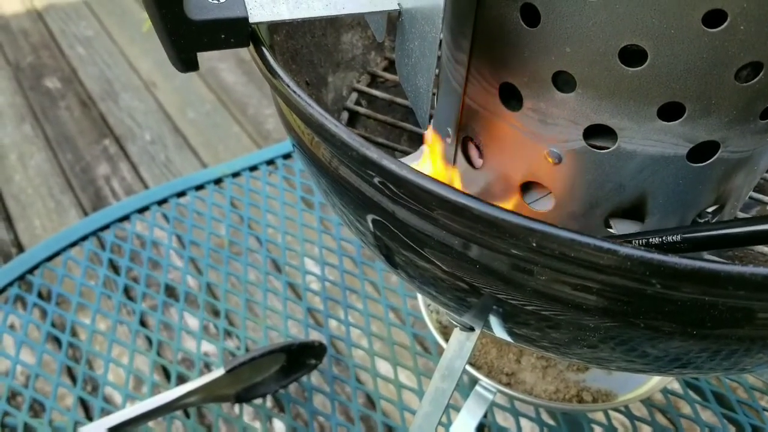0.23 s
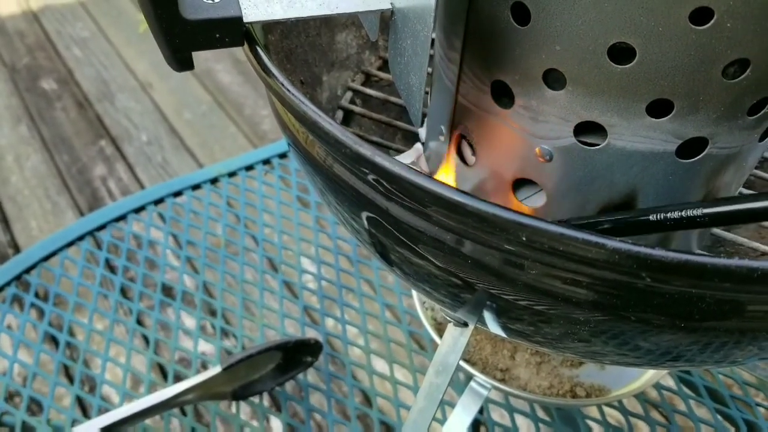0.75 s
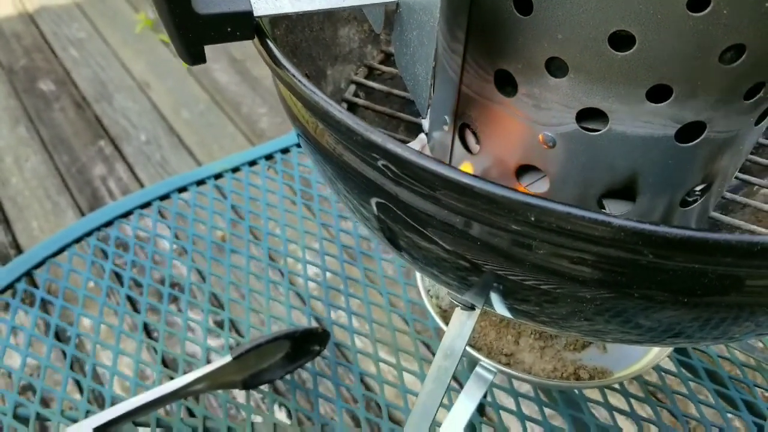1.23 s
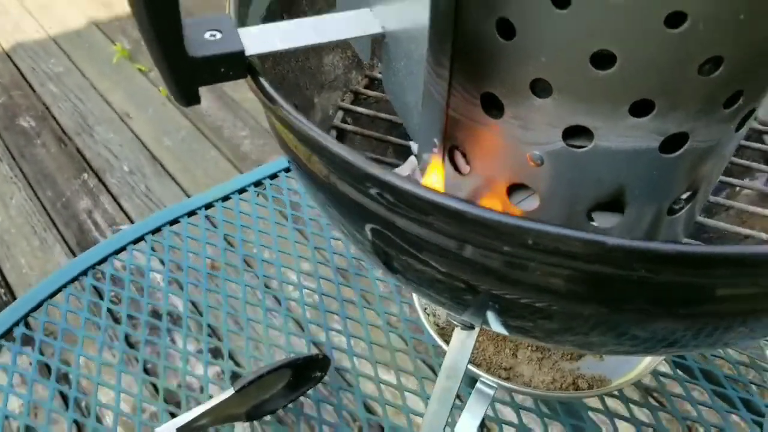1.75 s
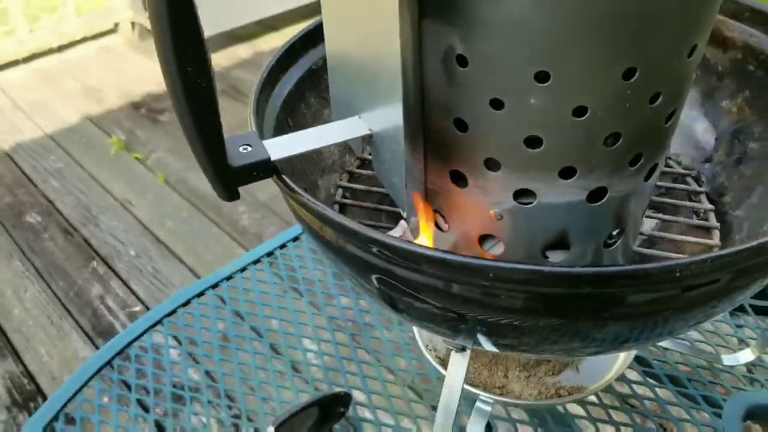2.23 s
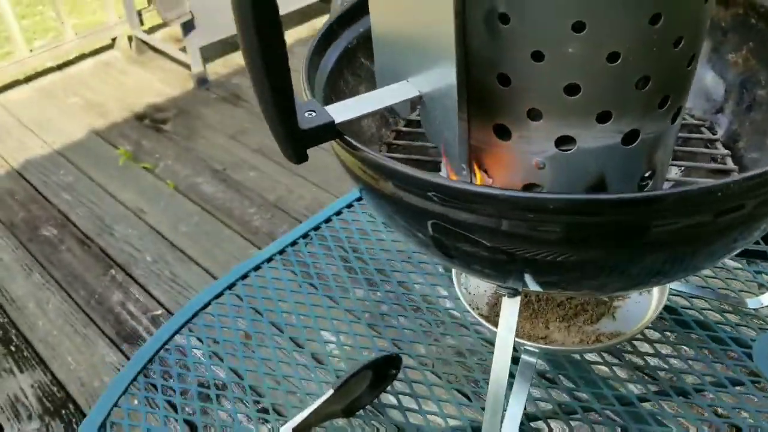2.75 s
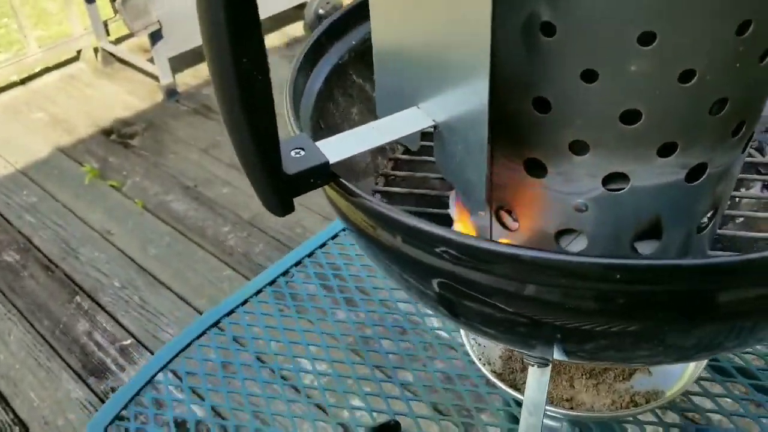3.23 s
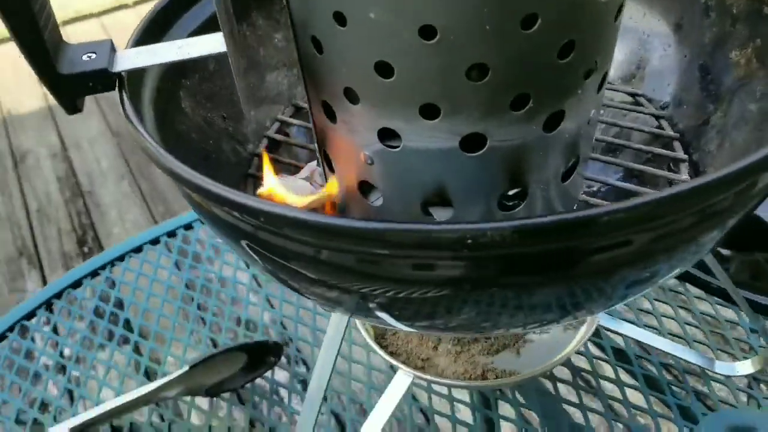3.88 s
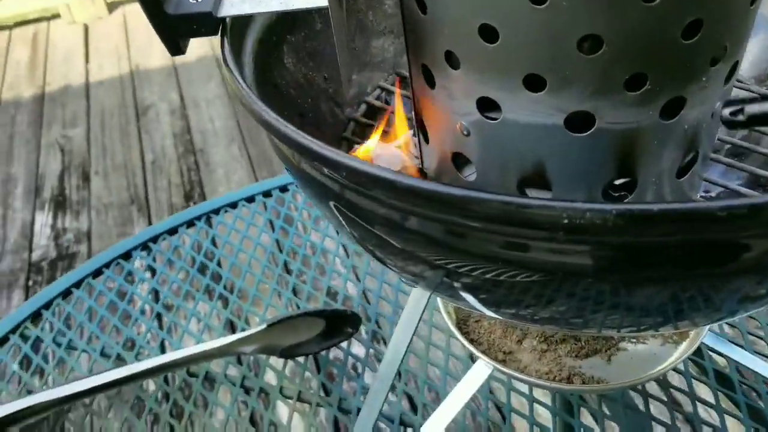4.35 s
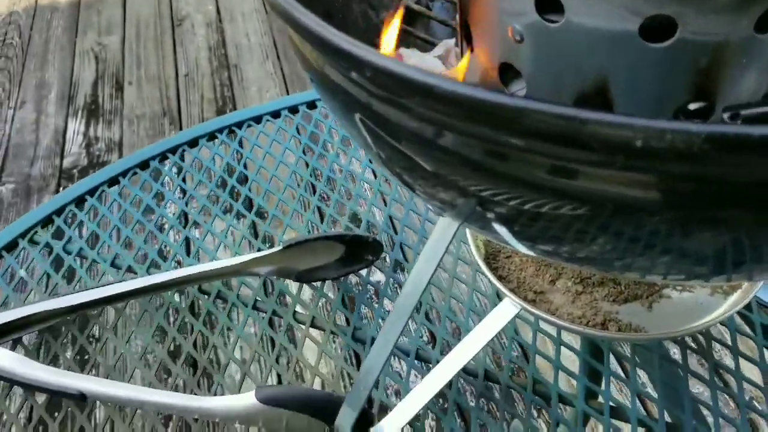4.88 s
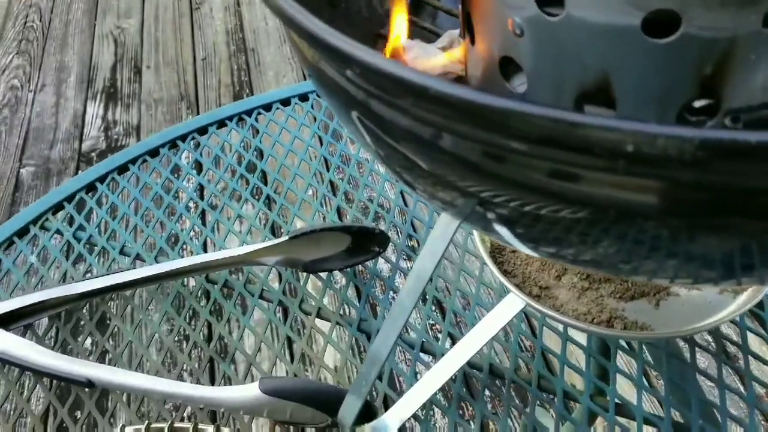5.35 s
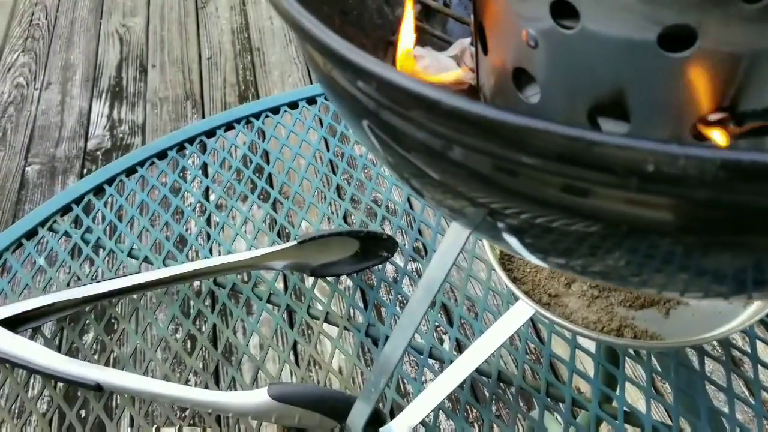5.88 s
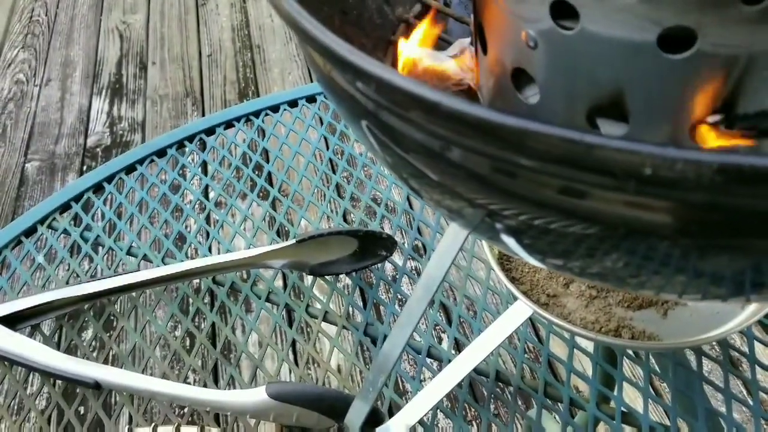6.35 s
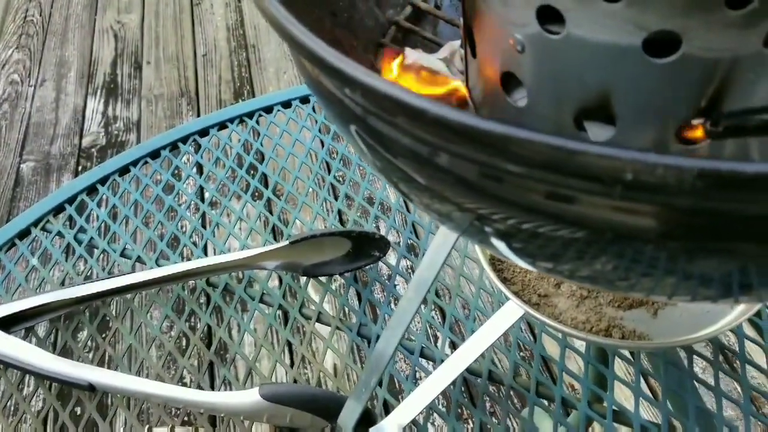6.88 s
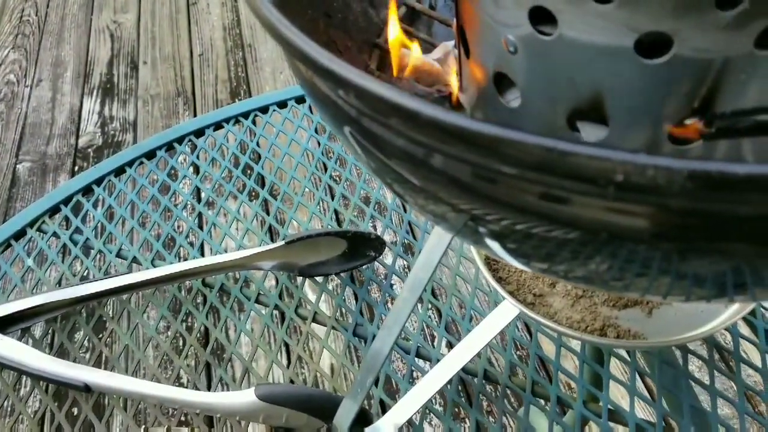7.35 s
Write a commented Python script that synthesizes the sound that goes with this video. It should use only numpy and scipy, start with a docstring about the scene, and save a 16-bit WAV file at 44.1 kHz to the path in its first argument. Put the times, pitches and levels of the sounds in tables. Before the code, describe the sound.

Paper burns under a charcoal chimney starter in a yard, with a low flame rumble and a hollow draught. Sharp, irregular pops and clicks rattle in the steel grill, and shoes scuff faintly. A long gas lighter is handled and snapped twice, its spring ringing briefly. Then the fire sounds quieter, with fine crackles, while gusts thump on the right side of the close microphone. A distant fan hums faintly.

```python
"""In a yard, paper burns and ticks under a charcoal chimney starter in a small kettle grill.
A long gas lighter is handled and fired twice, its spring ringing after each snap. Every pop and
click is an impulse that rattles around the steel bowl and echoes from the yard. The flames rumble,
the draught roars and a distant fan unit hums. Shoes scuff as the microphone is carried along;
after that, turbulent air buffets its right port."""
import sys
import numpy as np
from scipy import signal
from scipy.fft import rfft, irfft, next_fast_len
from scipy.io import wavfile
from scipy.ndimage import uniform_filter1d, map_coordinates

SR = 44100
rng = np.random.default_rng(int(sys.argv[2]) if len(sys.argv) > 2 else 0)


def wav_out(sig):
    """Save sig, one row per channel (or a flat mono array), as 16-bit PCM at SR to the path in sys.argv[1]."""
    wavfile.write(sys.argv[1], SR, np.round(np.clip(np.atleast_2d(sig).T, -1, 1) * 32767).astype(np.int16))


N = 335601

# Low sounds as the microphone moves. Each row: time in seconds, rumble level in dB, hum gain in dB.
LOW_LEVELS = [(0, -46.5, -0.5), (1.5, -45, 1), (3, -46.5, -1.5), (4.4, -44.5, -4), (5.1, -52, -11),
              (6.2, -52.5, -13.5), (7.61, -52, -15.5)]


def pops(level_db=12, spacing_s=.04, rattle_hz=2200, pitch_scatter=0.42, scatter_db=0.5):
    """Impulsive excitation: the fire pops, and the handled lighter clicks and faintly rattles."""
    # Each row: start in seconds, relative level in dB, body in dB, treble in dB,
    # lowest resonance in Hz, echo in dB.
    impulses = [(0.2097, -38.5, 7, -3, 5900, -8), (0.458, -17, 8, 3, 1120, -12),
                (0.5122, -27.5, 15, -10, 1340, -14), (0.5256, -30, 6, -6, 1850, -13.5),
                (0.5362, -26.5, 15, -8, 1190, -18), (0.582, -31, 2, -1, 2530, -9.5),
                (0.6412, -6, 4, 0.5, 1142, -19.5), (0.81, -19, 6, -1, 1247, -16),
                (0.9154, -33, 6, -7, 2150, -6), (1.756, -33.5, 15, -12, 1270, -2),
                (3.215, -14.5, 1.5, 3.5, 1290, -18), (4.0934, -29.5, 3, -0.5, 7940, -22),
                (4.193, -32, 6, -11, 3900, -19.5), (4.2095, -25.5, -1.5, -4.5, 3800, -18),
                (4.3303, -21, -7, -4.5, 1200, -15.5), (4.3331, -26.5, 5.5, -1, 8000, -16),
                (4.4305, -27.5, -5, 0, 3320, -22), (4.435, -24, -1, 2.5, 1650, -4.5),
                (4.4799, -29, -1, 0, 4130, -10), (4.5983, -18, 5, 1.5, 1840, -11.5),
                (4.691, -32, 11, 0, 1720, -15.5), (4.7235, -23.5, 3, -1.5, 2650, -5.5),
                (4.7396, -26, 3.5, -2.5, 8600, -20), (4.779, -30, 4.5, -3.5, 6120, -15),
                (4.7898, -28, 9.5, -3.5, 5000, -3.5), (4.8308, -29, -3, 0.5, 4870, -3.5),
                (4.8474, -16, 1, 4, 6830, -14), (5.3612, -39, 5, 0, 2220, -4),
                (5.3725, -37.5, -5, -5, 3450, -6), (5.394, -28.5, 2.5, -21, 3220, -7),
                (5.482, -24, -1, -2, 1300, -11.5), (5.702, -37, 12.5, 0.5, 1733, -3.5),
                (5.8312, -17, 18, 11, 6710, -19)]
    # Each row: start in seconds, end in seconds, mean relative level in dB.
    rattle_spells = [(0.551, 0.591, -34), (3.29, 3.4, -41), (3.938, 4.0, -41.5), (4.102, 4.181, -40),
                     (4.699, 4.781, -39), (5.751, 5.79, -45)]
    out = np.zeros((2, N))
    for s, db, *colour in impulses:
        add(out, s, amp(db) * pop(*colour))
    for start, end, db in rattle_spells:
        for s in np.arange(start, end, spacing_s):
            softness, pitch = rng.standard_normal(2)
            ring_hz = rattle_hz * np.exp(pitch_scatter * pitch)
            click = pop(body_db=5, treble_db=-7, ring_hz=ring_hz, echo_db=-7)
            add(out, s + spacing_s * rng.random(), amp(db - scatter_db * softness) * click)
    return amp(level_db) * out


def pop(body_db, treble_db, ring_hz, echo_db, ring_db=6.5, ring_width=.08, pan_db=-7):
    """Source and filter: resonances colour one short burst, and its echo follows."""
    # Spectrum common to all clicks. Each row: frequency in Hz, level in dB.
    spectrum = [(200, -28), (600, -11), (1050, 2), (1300, 0), (1550, -5), (2250, 2), (2900, -2), (3600, -1),
                (5000, -6), (7900, -4), (10000, -7), (13000, -4), (16000, -6)]
    # Each row: frequency as a multiple of ring_hz, height as a multiple of ring_db.
    modes = [(1, 1.5), (1.71, 0.98), (3.27, 1.13), (6.7, 0.34)]
    tilt = [(1250, body_db), (1700, 0), (4500, 0.0012), (7500, treble_db), (12000, treble_db - 3)]
    colour = lambda hz: along(spectrum, hz) + along(tilt, hz)
    peaks = lambda hz: sum(height / (1 + ((hz / (k * ring_hz) - 1) / ring_width) ** 2)
                           for k, height in modes)
    burst = snap_in_bowl()
    # The burst is evened out, so that the body and its resonances set the colour.
    click = impulse(lambda hz: colour(hz) + ring_db * peaks(hz) - smooth_db(burst, hz))
    direct = signal.fftconvolve(burst, click[None], axes=1)
    direct /= np.linalg.norm(direct)
    # The echo gathers sound from all directions, so the narrow resonances average out.
    broad = impulse(colour)
    sound = amp(echo_db) * signal.fftconvolve(yard(), broad[None] / np.linalg.norm(broad), axes=1)
    # The microphone's housing shades the far, left port only in the treble.
    shade = lambda hz: amp(np.outer([.5, -.5], pan_db * along([(1400, 0), (3800, 1)], hz)))
    add(sound, 0, amp(3) * filtered(direct, shade))
    return sound


def snap_in_bowl(snap_t60=.005, rattle_t60=.025, rattle_db=-4.5, left_delay_s=.0004):
    """Path difference and reflection: a snap reaches the right port first and rattles in the bowl."""
    t = np.arange(SR // 16) / SR
    snap = rng.standard_normal(len(t)) * fade(t, snap_t60) * (1 - np.exp(-t / 0.00017))
    rattle = rng.standard_normal((2, len(t))) * fade(t, rattle_t60) * (1 - np.exp(-t / 0.00014))
    delayed = np.interp(t - left_delay_s, t, snap, left=0)
    return np.array([unit(delayed), unit(snap)]) + amp(rattle_db) * unit(rattle)


def yard(build_s=0.014):
    """Diffuse reverberation: a stereo echo of about unit energy builds up and decays band by band."""
    # Each row: frequency in Hz, time to fall 60 dB in seconds.
    decay_times = [(300, 0.055), (2000, .36), (6000, 0.22), (14000, 0.28)]
    hz, t, bands = signal.stft(rng.standard_normal((2, SR // 2)), SR, nperseg=256)
    envelope = fade(t, along(decay_times, hz)[:, None]) * (1 - np.exp(-t / build_s))
    tail = signal.istft(bands * envelope, SR, nperseg=256)[1]
    return tail / np.linalg.norm(tail[0])


def igniter(buzz_t60=0.26):
    """Damped free vibration: the lighter's spring and steel nose buzz and ring after each snap."""
    # Each row: frequency in Hz, relative level in dB, time to fall 60 dB in seconds.
    steel_modes = [(1190, -9, .35), (1688, -2, .48), (1790, -3, .2), (1935, -1, .2), (2083, 1, .27),
                   (2207, -3, .21), (2460, 1, .23), (3074, 0, .12), (3680, -2, .14), (5222, -8, .19),
                   (5731, -6, .15), (6957, -4, .17), (7343, -4, .17), (8253, -8, .13)]
    # The igniter snaps and springs back. Each row: start in seconds, ring in dB, buzz in dB.
    snaps = [(4.849, -48.5, -34), (5.396, -53, -54), (5.831, -48, -34)]
    out, t = np.zeros((2, N)), np.arange(SR // 2) / SR
    # Each row: frequency in Hz, spectral density in dB.
    buzz_spectrum = [(300, 3), (700, -4), (1100, -9.5), (2000, -5), (4500, -9), (7200, -7.5), (9500, -10.5),
                     (13000, -13), (16000, -13.5)]
    for s, ring_db, buzz_db in snaps:
        ring = 0
        for hz, db, t60 in steel_modes:
            gain = amp(db + rng.normal(0, 1.8, (2, 1)))
            phase = rng.normal(0, 1.0, (2, 1))
            ring += gain * fade(t, t60) * np.sin(2 * np.pi * hz * t + phase)
        buzz = noise(buzz_spectrum, size=len(t)) * fade(t, buzz_t60)
        add(out, s, (amp(ring_db) * ring + amp(buzz_db) * buzz) * (1 - np.exp(-t / 0.00053)))
    return out


def flames(roar_db=1):
    """Combustion noise: unsteady burning gives a fluttering rumble, the draught a hollow roar."""
    # Each row of both: frequency in Hz, spectral density in dB.
    rumble_spectrum = [(15, -38), (30, -29), (45, -3), (65, 1), (100, -2.5), (150, -7), (220, -10.5),
                       (320, -18), (500, -24.5), (1000, -56)]
    roar_spectrum = [(120, -21), (250, 0), (420, -1), (560, 1.5), (740, 7), (950, -3), (1300, -8),
                     (1800, -17), (2600, -30), (5000, -38)]
    # Each row: time in seconds, level in dB.
    roar_levels = [(0.0, -52.5), (0.47, -53.5), (0.95, -51.5), (2.99, -54), (4.66, -52), (4.89, -59.5),
                   (5.17, -59.5), (6.63, -62), (7.61, -60.5)]
    rumble = gains(LOW_LEVELS)[0] * amp(1.4 * wobble(11)) * rush(rumble_spectrum, patchy_db=0.97)
    roar = gains(roar_levels)[0] * amp(roar_db + 0.16 * wobble(7.6))
    return rumble + roar * rush(roar_spectrum, patchy_db=1.33)


def paper(count=480, spread_db=3.5, t60=0.015, tick_db=-4, smoulder_db=-77.5):
    """Shot noise: curling paper crackles at random, louder in each flare, with a few larger ticks."""
    # Each row: peak time in seconds, half width in seconds, gain in dB.
    flares = [(4.2, 0.73, -67), (6.3, .2, -67), (7.35, 0.098, -68)]
    # Each row: start in seconds, relative level in dB.
    large_ticks = [(6.2522, -49), (6.3684, -50.5), (6.501, -45), (6.6, -40.5), (6.6252, -49.5),
                   (7.2744, -51), (7.442, -49)]
    out, t = np.zeros((2, N)), np.arange(SR // 50) / SR
    tick = lambda: rng.standard_normal((2, len(t))) * fade(t, t60)
    for when, softness in rng.random((count, 2)):
        add(out, when * N / SR, amp(-spread_db * np.log(softness + 0.028)) * tick())
    out *= amp(smoulder_db) + sum(amp(db) * swell(s, width) for s, width, db in flares)
    for s, db in large_ticks:
        add(out, s, amp(db + tick_db) * tick())
    brightness = [(800, -19.5), (2800, -6.0), (4000, -3.5), (9000, -1.5), (14000, 0.5)]
    return filtered(out, lambda hz: amp(along(brightness, hz)))


def buffeting(breeze_db=-50.5, start_s=5.1, rise_s=.1, flutter_db=2, puff_cycles=1.64, left_db=-24):
    """Turbulent pressure: a light breeze, fluttering gusts and single puffs push on the right port."""
    # Each row: peak time in seconds, half width in seconds, level in dB.
    gusts = [(4.66, 0.06, -37.5), (4.81, .06, -29), (5.191, 0.1, -38.5), (5.519, 0.057, -32),
             (5.74, 0.029, -30), (5.92, 0.03, -36.5), (6.349, 0.061, -30.5), (6.492, 0.012, -28.5),
             (6.74, 0.035, -36), (7.31, 0.019, -39), (7.47, 0.038, -29.5)]
    # Each row: start in seconds, level in dB, frequency in Hz.
    puffs = [(4.794, -15, 59), (5.195, -15.5, 107), (5.832, -18, 59.93), (6.345, -17.5, 91.5),
             (6.471, -20.5, 71), (6.598, -26, 109), (7.412, -22, 96)]
    # Each row of both: frequency in Hz, spectral density in dB.
    eddies = [(15, -5), (35, -1.5), (65, 6.5), (100, 3), (170, -9), (260, -22.5), (450, -42.5),
              (1200, -66.5)]
    small_eddies = [(90, -16), (170, 1.5), (260, -5), (400, -22), (900, -51), (2500, -120)]
    breeze = amp(breeze_db) * np.clip((np.arange(N) / SR - start_s) / rise_s, 0, 1)
    strength = breeze + sum(amp(db) * swell(s, width) for s, width, db in gusts)
    strength *= amp(flutter_db * wobble(22))
    air = strength * noise(eddies)
    air += amp(-53) * unit(strength ** 2 * noise(small_eddies))  # squaring favours the strongest gusts
    t = np.arange(SR // 4) / SR
    for s, db, hz in puffs:
        envelope = np.exp(-(t * hz / puff_cycles) ** 2) * (1 - np.exp(-t / 0.00081))
        add(air, s, amp(db) * envelope * np.sin(2 * np.pi * hz * t))
    return air * amp([[left_db], [0]])


def scuffs(grain_db=2.0, catch_db=1.05):
    """Sliding friction: each sole scrapes and swishes over the boards, catching on grit."""
    # Each row: peak time in seconds, half width in seconds, scrape in dB, swish in dB.
    strokes = [(1.81, .027, -52.5, -60), (2.11, 0.042, -60, -71), (2.41, 0.053, -66, -58),
               (2.51, 0.05, -61.5, -83), (3.061, 0.034, -60.5, -64), (3.64, 0.075, -66.5, -72.5),
               (3.81, 0.05, -73, -62), (3.85, .03, -48, -71), (4.145, 0.021, -55, -64),
               (4.39, 0.1, -64.5, -60), (4.47, 0.021, -55.5, -74), (4.63, .025, -53, -67)]
    # Each row of both: frequency in Hz, spectral density in dB.
    scrape_spectrum = [(500, -36), (1300, 4), (2500, -3.5), (4500, -9), (7000, -15.5), (12000, -41)]
    swish_spectrum = [(2500, -18), (6000, -2), (8000, 0), (10000, -3), (12500, -1), (16000, -3)]
    scrape, swish = sum(np.outer(amp(levels), swell(s, width)) for s, width, *levels in strokes)
    grit = amp(grain_db * wobble(500) + catch_db * wobble(70))
    return grit * (scrape * noise(scrape_spectrum) + swish * noise(swish_spectrum))


def fan_hum(waver_rate=5):
    """Periodic forcing: a distant fan's motor and blades give tones that waver in the air."""
    # Each row: frequency in Hz, level in dB, unsteadiness from 0 to 1.
    tones = [(58.9, -49, 0.5), (116.4, -48, 0), (151.6, -54, 0.6), (236.6, -59, 0.5), (354.7, -58, 0.35),
             (705.6, -63.5, 1)]
    hum, t = np.zeros(N), np.arange(N) / SR
    for hz, db, unsteady in tones:
        waver = 1 + unsteady * (wobble(waver_rate) + 1j * wobble(waver_rate))  # amplitude and phase
        hum += amp(db) * np.real(waver * np.exp(2j * np.pi * hz * t))
    return gains(LOW_LEVELS)[1] * hum


def gas_whistle(pitch_jitter=.05):
    """Jet tone: unlit gas leaves the lighter's nozzle with a faint, rough, rising whistle."""
    # Each row: time in seconds, frequency in Hz, level in dB.
    glide = [(5.05, 2050, -77), (5.171, 2150, -74.5), (5.28, 2195, -73), (5.389, 2357, -71)]
    s, hz, db = np.transpose(glide)
    pitch = np.interp(np.arange(N) / SR, s, hz) * (1 + pitch_jitter * wobble(600))
    whistle = wobble(500) * np.sin(2 * np.pi * np.cumsum(pitch) / SR)
    return gains(np.c_[s, db])[0] * whistle


def hiss(level_db=-74):
    """Stationary noise: a faint, even hiss lies under everything."""
    # Each row: frequency in Hz, spectral density in dB.
    spectrum = [(500, 8), (2000, -5), (3400, -2), (3950, 3), (4500, -1), (5600, -6.5), (8200, 1.5),
                (9500, -20), (11500, -2.5), (12150, 6), (12900, 0.5), (16000, -3.5)]
    return amp(level_db) * noise(spectrum)


def rush(spectrum, patchy_db):
    """Random modulation: stereo noise of rms 1 with patches of varying gain, nearly mono in the bass."""
    # Each row: frequency in Hz, side level relative to mid in dB.
    width = [(60, -12.5), (200, -15.5), (380, -3.5), (700, -3.5), (1290, 4.5), (2400, 0)]
    bands = signal.stft(rng.standard_normal((2, N)), nperseg=512)[2]
    patches = uniform_filter1d(rng.standard_normal(bands.shape[1:]), size=4, axis=0)
    patches = uniform_filter1d(patches, size=8, axis=1)
    pair = signal.istft(bands * amp(patchy_db * unit(patches)), nperseg=512)[1][:, :N]
    mid, side = filtered(pair, lambda hz: amp(along(spectrum, hz) + np.outer([0, 1], along(width, hz))))
    return unit(np.array([mid + side, mid - side]))


def noise(spectrum, size=N):
    """Spectrally shaped stereo noise of rms 1."""
    return unit(filtered(rng.standard_normal((2, size)), lambda hz: amp(along(spectrum, hz))))


def impulse(colour, size=512):
    """The minimum-phase click whose spectrum is colour(Hz) in dB."""
    cepstrum = irfft(np.log(amp(colour(np.fft.rfftfreq(size, 1 / SR)))))
    cepstrum[1:size // 2] *= 2
    cepstrum[size // 2 + 1:] = 0
    return irfft(np.exp(rfft(cepstrum)))


def smooth_db(burst, hz, size=1024, bins=13):
    """The spectral envelope of a short stereo burst, in dB."""
    power = np.mean(np.abs(rfft(burst, size)) ** 2, axis=0)
    outline = 10 * np.log10(np.abs(uniform_filter1d(power, bins)) + 1e-12)
    return np.interp(hz, np.fft.rfftfreq(size, 1 / SR), outline)


def filtered(x, response):
    """Linear filtering: the spectrum of x times response(Hz)."""
    n = x.shape[-1]
    padded = next_fast_len(n + 4096)
    return irfft(rfft(x, padded) * response(np.fft.rfftfreq(padded, 1 / SR)), padded)[..., :n]


def gains(rows):
    """One gain per sample for each dB column; silent outside the rows."""
    s, *columns = np.transpose(rows)
    times = np.r_[s[0] - .05, s, s[-1] + .05]
    return [amp(np.interp(np.arange(N) / SR, times, np.r_[-120, db, -120])) for db in columns]


def swell(peak_s, width_s):
    """A rounded rise and fall with exponential flanks, 1 at its peak."""
    away = np.abs(np.arange(N) / SR - peak_s) / width_s
    return 2 * np.exp(-away) / (1 + np.exp(-2 * away))


def wobble(rate):
    """A smooth random curve, rate knots a second."""
    return map_coordinates(rng.standard_normal(int(N * rate / SR) + 4), [np.arange(N) * rate / SR])


def fade(t, t60):
    """Exponential decay, 60 dB down at t60."""
    return np.exp(-np.log(1000) * t / t60)


def along(points, hz):
    """(Hz, value) points read on a log axis."""
    frequencies, values = np.transpose(points)
    return np.interp(np.log(hz + 1), np.log(frequencies), values)


def add(track, s, sound):
    """Superposition: mix a sound into a track at s seconds."""
    part = track[..., max(round(s * SR), 0):][..., :sound.shape[-1]]
    part += sound[..., :part.shape[-1]]


def amp(db):
    """Decibels to gain."""
    return 10 ** (np.asarray(db) / 20)


def unit(x):
    """Scale to rms 1."""
    return x / np.sqrt(np.mean(x ** 2) + 1e-20)


def scene():
    """Superposition: the pressures of all sources add."""
    surroundings = flames() + fan_hum() + scuffs() + buffeting() + hiss()
    return surroundings + igniter() + gas_whistle() + paper() + pops()


def record(dry):
    """Band limiting: a steep low-pass removes the highest treble."""
    top_hz = 15800
    return filtered(dry, lambda hz: 1 / np.sqrt(1 + (hz / top_hz) ** 200))


dry = scene()
out = record(dry)
wav_out(out)
```